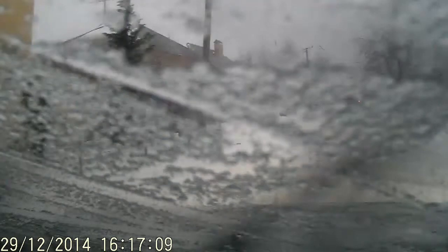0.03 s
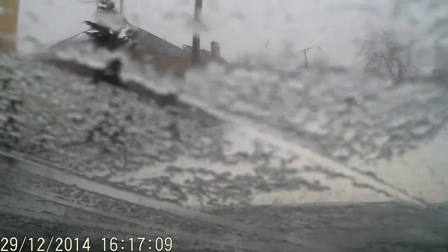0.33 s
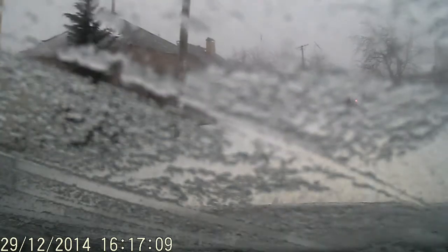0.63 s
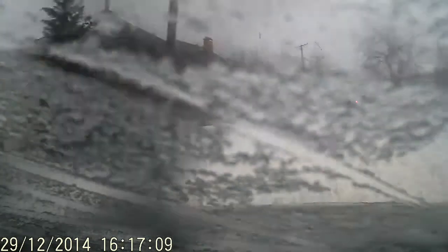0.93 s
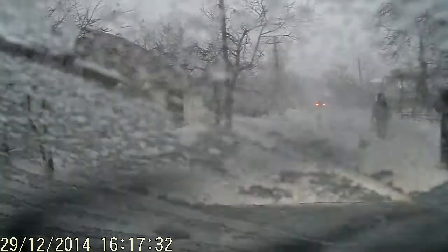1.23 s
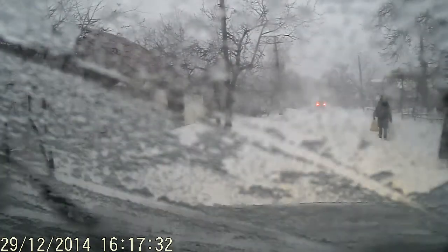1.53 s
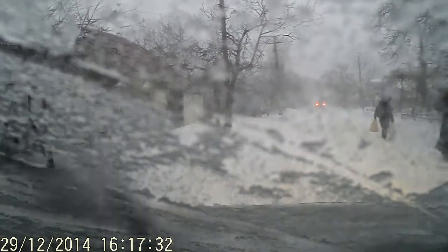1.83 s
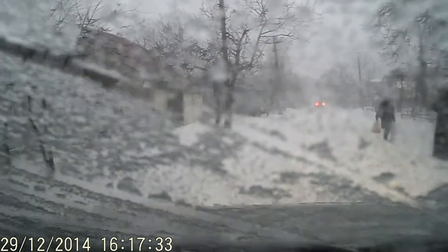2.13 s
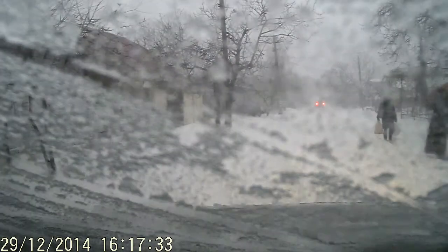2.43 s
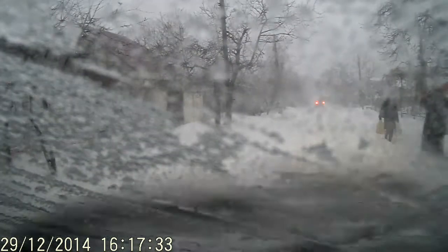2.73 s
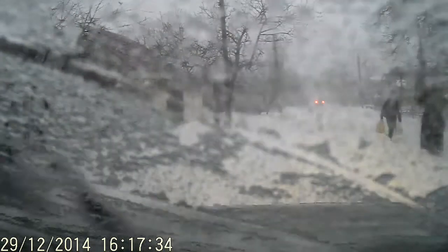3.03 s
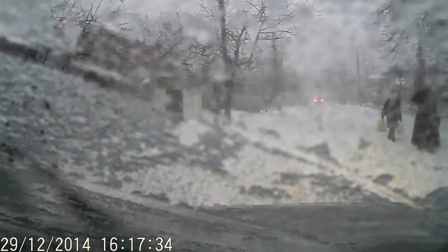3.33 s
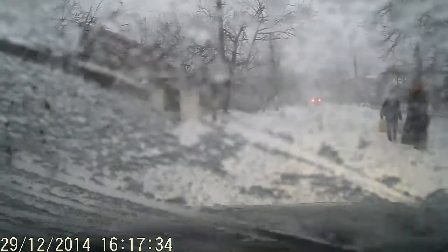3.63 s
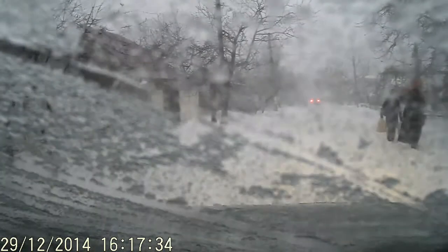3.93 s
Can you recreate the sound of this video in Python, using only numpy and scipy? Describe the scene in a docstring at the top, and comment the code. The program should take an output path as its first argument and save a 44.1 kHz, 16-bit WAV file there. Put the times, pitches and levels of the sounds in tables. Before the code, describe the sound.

Heard inside a slowly moving car, the engine labours with a deep boom before picking up speed. Wipers knock and rub close to the microphone, over their humming motor, steady heater air and a few tiny clicks.

```python
"""Inside a small car creeping over a snowy road, heard from a camera microphone on the windscreen.
From the start the heater blower rushes and the wiper motor hums over the rumble of the tyres.
Within a second the engine lugs and makes the cabin boom; then the wipers thud and scuff on the glass,
close to the microphone. After two seconds the engine revs up and the car pulls away.
All along the camera adds its own hiss, a thin whine that comes and goes and a few electrical clicks."""
import sys
import numpy as np
from scipy.fft import rfft, irfft, next_fast_len
from scipy.io import wavfile
from scipy.ndimage import uniform_filter1d, map_coordinates

SR = 44100
rng = np.random.default_rng(int(sys.argv[2]) if len(sys.argv) > 2 else 0)


def digitize_waveform(pressure):
    """Quantize a signal to 16-bit integers and store it at the path in sys.argv[1].

    Rows of a 2-D input are taken as channels; values are limited to [-1, 1].
    """
    field = np.atleast_2d(pressure).T
    bounded = np.clip(field, -1, 1)
    quanta = np.round(bounded * 32767).astype(np.int16)
    wavfile.write(sys.argv[1], SR, quanta)


N = 176400  # 4 s


def amp(db):
    """Decibels to gain."""
    return 10 ** (np.asarray(db) / 20)


def unit(x):
    """Scale to rms 1."""
    return x / np.sqrt(np.mean(x ** 2) + 1e-20)


def clock():
    """The time of each sample in seconds."""
    return np.arange(N) / SR


def curves(rows):
    """One value per sample for each column after the time."""
    times, *columns = np.transpose(rows)
    return [np.interp(clock(), times, column) for column in columns]


def wobble(rate):
    """A smooth random curve, rate knots a second."""
    knots = rng.standard_normal(int(N * rate / SR) + 4)
    return map_coordinates(knots, [clock() * rate])


def filtered(x, response):
    """x through a filter whose gain is response(hz)."""
    size = next_fast_len(N + SR // 2)
    hz = np.fft.rfftfreq(size, 1 / SR)
    return irfft(rfft(x, size) * response(hz), size)[:N]


def noise(colour):
    """Noise of rms 1, its spectrum drawn through rows of frequency_hz, relative_db."""
    points_hz, points_db = np.transpose(colour)

    def response(hz):
        return amp(np.interp(np.log(hz + 1), np.log(points_hz + 1), points_db, left=-120, right=-120))
    return unit(filtered(rng.standard_normal(N), response))


def tone(hz):
    """A sine of rms 1 that follows a pitch curve."""
    cycles = np.cumsum(hz * np.ones(N)) / SR
    return np.sqrt(2) * np.sin(2 * np.pi * (cycles + rng.random()))


def camera_electronics(hiss_db=-61.5, whistle_hz=9804, whistle_db=-73, flicker_db=1.6):
    """The camera's own noise floor: hiss, a thin whistle and bursts of electrical whine."""
    # spectrum of the hiss: frequency_hz, relative_db
    hiss_colour = [(2500, -4.5), (5000, 1.5), (7500, 1), (12000, 0), (14500, 0), (15800, -5.5)]
    # bursts of whine: start_s, end_s
    bursts = [(.805, .905), (1.905, 2.04), (2.035, 2), (2.841, 2.94), (3.9, 4)]
    # tones of the whine: pitch_hz, level_db
    whine_tones = [(2796, -70.5), (4194, -71), (5593, -71), (8389, -73), (11186, -75)]
    t = clock()
    gate = sum(1. * ((t > start_s) & (t < end_s)) for start_s, end_s in bursts)
    gate = uniform_filter1d(gate, size=300)  # 7 ms fades
    whine = gate * sum(amp(db + flicker_db * wobble(40)) * tone(hz) for hz, db in whine_tones)
    hiss = amp(hiss_db) * noise(hiss_colour)
    whistle = amp(whistle_db) * tone(whistle_hz + 1.9 * wobble(5.9))
    return hiss + whistle + whine


def clicks_and_step(width_s=1 / 8000, pop_s=1.0573, pop_height=-0.063, pop_decay_s=0.00091):
    """Tiny square electrical pulses; and, apart from them, at 1.06 s the sound steps suddenly and settles back
    within a millisecond."""
    # electrical clicks: time_s, signed_height
    clicks = [(0.7006, 0.081), (1.736, 0.093), (2.7358, -0.11)]
    t, spikes = clock(), np.zeros(N)
    for time_s, height in clicks:
        spikes[round(time_s * SR)] = height
    # a sinc response widens each spike into a square pulse
    pulses = filtered(spikes, lambda hz: width_s * SR * np.sinc(hz * width_s))
    pop = pop_height * (t >= pop_s) * np.exp(-abs(t - pop_s) / pop_decay_s)
    return pulses + pop


def heater_blower():
    """Steady heater air with a slight flutter, coloured by the cabin and by the vents."""
    # air ringing in the cabin: frequency_hz, relative_db
    cabin_colour = [(90, -9), (125, -2), (150, -11), (172, -4.5), (199, 1), (240, -2.5), (295, -6.5),
                    (338, -1), (372, -9), (435, -1.5), (485, -5.5), (526, -13.5), (586, -2.5), (641, -8),
                    (732, -2), (829, -8.5), (900, -8), (1100, -24)]
    # air rushing through the vents: frequency_hz, relative_db
    vent_colour = [(680, -32), (900, -5), (1030, 0.5), (1170, -2.5), (1240, -8), (1360, -3.5), (1460, -9),
                   (1580, -5), (1700, -15.5), (1840, -10.5), (1930, -15.5), (2240, -16.5), (2500, -21.5),
                   (3100, -27), (3700, -29), (3970, -25), (4600, -32), (6500, -44.5)]
    # air at the microphone: time_s, cabin_db, vent_db
    air_levels = [(0, -38, -42), (.3, -37.5, -41.5), (.7, -39, -42.5), (1.05, -38, -43), (1.33, -38, -41),
                  (1.62, -39.5, -43.5), (1.88, -37, -43.5), (2.1, -40.5, -43.5), (2.4, -39, -42.5),
                  (2.75, -39, -41.5), (3.05, -38.5, -42.5), (3.4, -37.5, -41.5), (3.65, -38.5, -42.5),
                  (4, -38, -43)]
    cabin_db, vent_db = curves(air_levels)
    cabin = amp(cabin_db + 0.67 * wobble(7.02)) * noise(cabin_colour)
    vents = amp(vent_db + 0.35 * wobble(9.01)) * noise(vent_colour)
    return cabin + vents


def tyres():
    """Low rumble of the tyres on packed snow, heard from inside the car."""
    # spectrum of the rumble: frequency_hz, relative_db
    rumble_colour = [(10, -10), (20, -0.5), (35, -2), (52, 0.5), (68, -11), (90, -12.5), (115, -10.5),
                     (150, -29.5), (250, -53)]
    # swells of the rumble: time_s, level_db
    rumble_levels = [(0, -36), (.6, -38.5), (.9, -40), (1.15, -32.5), (1.42, -37), (1.52, -29), (1.65, -35),
                     (2.2, -32.5), (2.55, -33.5), (2.9, -35.5), (3.25, -35), (3.42, -29), (3.7, -34),
                     (4, -34)]
    level_db, = curves(rumble_levels)
    return amp(level_db) * noise(rumble_colour)


def wiper_motor():
    """A hum at multiples of the shaft speed, which sags as the blades drag."""
    # speed of the motor: time_s, shaft_hz
    speeds = [(0.0, 57), (0.17, 57.0), (0.26, 57.5), (0.48, 57.5), (0.78, 56), (1.01, 56), (1.19, 57.5),
              (1.59, 55.0), (2.0, 54.5), (2.63, 57.5), (3.91, 58), (4.0, 58)]
    # partials of the hum: shaft_multiple, level_db
    partials = [(1, -42.5), (2, -45), (3, -57), (4, -57.5)]
    shaft_hz, = curves(speeds)
    shaft_hz = shaft_hz * (1 + 0.0049 * wobble(12))
    return sum(amp(db + 0.99 * wobble(11)) * tone(multiple * shaft_hz) for multiple, db in partials)


def wiper_thuds(shudder_attack_s=0.0043, shudder_t60_s=0.18, knock_attack_s=0.0023, knock_t60_cycles=5.4):
    """Each arm lands on the windscreen, near the microphone, with a dull shudder and a damped knock."""
    # landings of the arms: start_s, shudder_db, knock_hz, knock_db
    thuds = [(1.047, -38, 300, -18), (1.261, -33, 190, -27), (1.49, -44, 70, -32), (1.818, -30, 131, -19.5),
             (2.151, -32.5, 100, -26), (2.85, -41, 62, -24), (3.335, -28.5, 125.4, -29)]
    # spectrum of the shudder: frequency_hz, relative_db
    shudder_colour = [(25, -17), (65, 3), (110, -5), (190, -2), (300, -14), (800, -42)]
    t, out = clock(), np.zeros(N)
    for start_s, shudder_db, knock_hz, knock_db in thuds:
        age = np.maximum(t - start_s, 0)
        shudder_rise = 1 - np.exp(-age / shudder_attack_s)
        shudder = amp(shudder_db - 60 * age / shudder_t60_s) * noise(shudder_colour)
        cycles = knock_hz * age
        knock_rise = 1 - np.exp(-age / knock_attack_s)
        knock = amp(knock_db - 60 * cycles / knock_t60_cycles) * np.sin(2 * np.pi * cycles)
        out += shudder_rise * shudder - knock_rise * knock
    return out


def wiper_scuffs():
    """Rubber blades scuff and squeak on the wet glass, each rub a short swell of band noise."""
    # rubs of the blades: middle_s, length_s, level_db, centre_hz, width_octaves
    scuffs = [(0.856, 0.012, -40, 1550, .18), (1.14, 0.063, -52, 1640, .4),
              (1.331, 0.089, -39.5, 310, 0.61), (1.345, 0.081, -41.5, 870, 0.38),
              (1.356, 0.018, -50.5, 1950, .5), (1.572, 0.02, -54, 2730, 0.48),
              (1.808, 0.022, -50.5, 2130, .45), (1.878, 0.032, -49, 1510, 0.44),
              (2.168, 0.017, -54, 2210, .4), (2.81, 0.059, -59, 1690, .4), (3.348, 0.035, -48, 1501, 0.42)]
    t, out = clock(), np.zeros(N)
    for middle_s, length_s, level_db, centre_hz, width_octaves in scuffs:
        def band(hz):
            return np.exp(-.5 * (np.log2((hz + 1) / centre_hz) / width_octaves) ** 2)
        rub = unit(filtered(rng.standard_normal(N), band))
        swell = np.exp(-2 * ((t - middle_s) / length_s) ** 2)
        out += amp(level_db) * swell * rub
    return out


def engine():
    """The engine lugs, then revs up: uneven low orders that follow its firing rate."""
    # the engine heard in the cabin: time_s, firing_hz, level_db
    revs = [(0, 27.5, -45), (.65, 27.05, -42), (.91, 38.54, -31), (1.05, 41.9, -35), (1.3, 26.9, -46),
            (1.6, 23.1, -34), (1.9, 23.56, -35), (2.12, 26.25, -34), (2.25, 33, -42), (2.45, 49.96, -32.5),
            (2.6, 57.05, -32.5), (2.8, 62.1, -41.5), (3.1, 72.97, -40.5), (3.35, 83.3, -39.5),
            (3.65, 81.5, -35.5), (4, 80, -38.5)]
    # engine orders: firing_multiple, relative_db
    orders = [(.5, -3.5), (1, -1), (1.5, -24), (2, -23), (2.5, -20.5), (3, -31)]
    firing_hz, level_db = curves(revs)
    return sum(amp(level_db + db + 0.99 * wobble(13)) * tone(multiple * firing_hz)
               for multiple, db in orders)


def cabin_boom(pitch_hz=22.6):
    """Shaken by the engine, the car body booms at its own pitch all around the microphone."""
    # swells of the boom: time_s, level_db
    boom_levels = [(0, -45), (.56, -39), (.68, -25), (.76, -23.5), (.86, -29.5), (.96, -28), (1.1, -38.5),
                   (1.4, -39), (1.5, -27), (1.65, -23.5), (1.85, -23), (2, -29.5), (2.2, -26), (2.42, -37),
                   (2.62, -25.5), (2.85, -33.5), (3.05, -40), (4, -33.5)]
    level_db, = curves(boom_levels)
    return amp(level_db) * tone(pitch_hz + 0.39 * wobble(5.26))


def scene():
    """The car and its wipers at the one windscreen microphone, plus the camera's own noise and a sudden step in
    the sound."""
    car = heater_blower() + tyres() + engine() + cabin_boom()
    wipers = wiper_motor() + wiper_thuds() + wiper_scuffs()
    camera = camera_electronics() + clicks_and_step()
    return (car + wipers + camera)[None]


def record(dry):
    """The camera keeps nothing above its band limit."""
    top_hz = 15830
    return filtered(dry[0], lambda hz: hz < top_hz)[None]


dry = scene()
out = record(dry)
digitize_waveform(out)
```